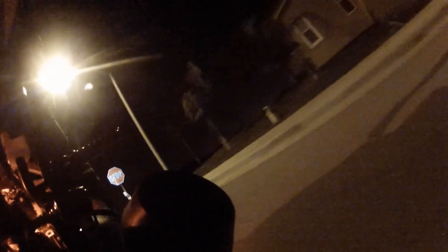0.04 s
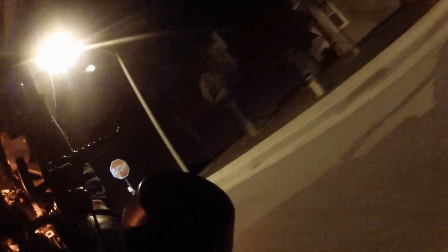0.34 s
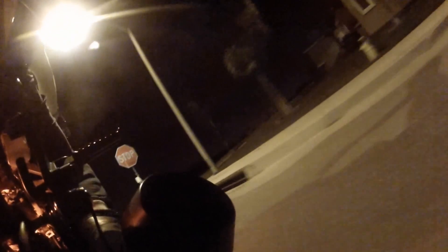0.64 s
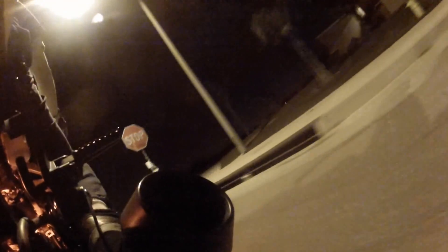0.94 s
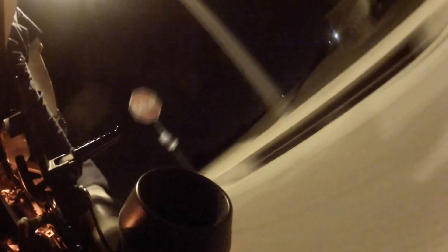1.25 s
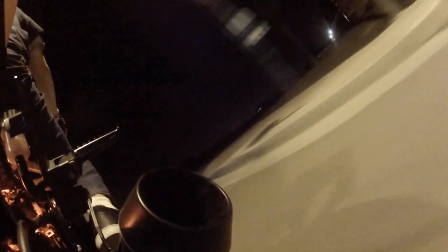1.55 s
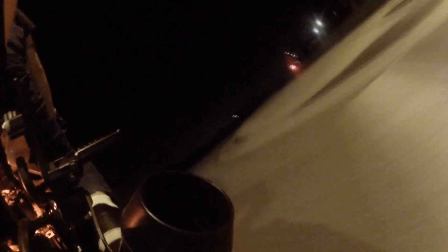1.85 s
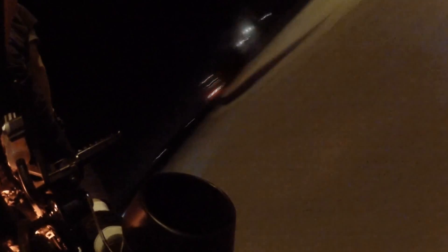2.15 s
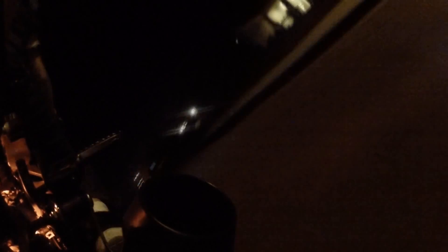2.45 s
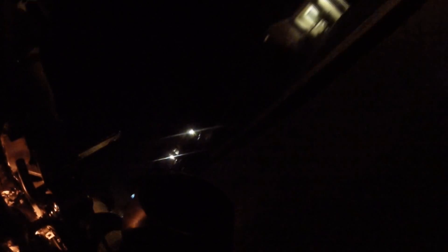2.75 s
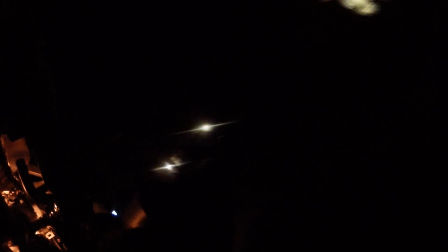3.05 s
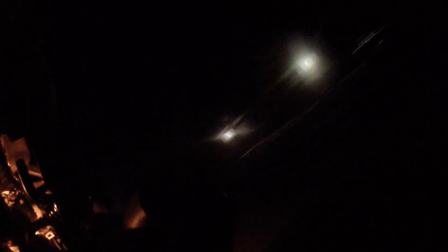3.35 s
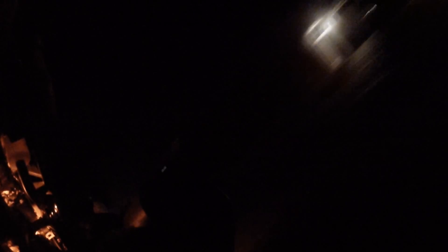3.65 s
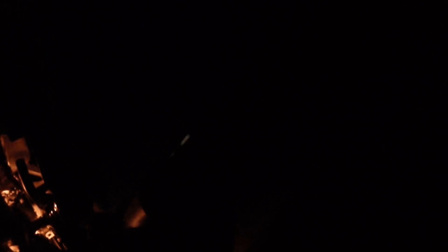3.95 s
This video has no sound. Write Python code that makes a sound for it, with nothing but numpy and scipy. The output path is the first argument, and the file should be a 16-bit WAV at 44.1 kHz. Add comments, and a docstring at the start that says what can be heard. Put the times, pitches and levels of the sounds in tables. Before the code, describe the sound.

A motorcycle engine runs close to the microphone, stumbling at low revs for the first half second. It sinks to a deep, uneven chug, growing slightly louder with a faint click at about 1.3 seconds. From 2 seconds it accelerates hard, rising steadily in pitch and brightening until the end at 4 seconds. A light metallic engine rattle and low wind and road rush continue underneath, and peaks distort slightly.

```python
"""A motorcycle, close up from a microphone on its own frame: it stumbles at low revs, lugs, then pulls
hard up through the revs. Firing pulses ring the exhaust and the valve gear rattles once a cycle.
Wind and road rush underneath. The overloaded recorder flattens the peaks, clicks once as its level
steps up, and mirrors the sound faintly around a high whistle frequency."""
import sys
import numpy as np
from scipy import signal
from scipy.fft import rfft, irfft
from scipy.io import wavfile
from scipy.ndimage import uniform_filter1d

SR = 44100
rng = np.random.default_rng(int(sys.argv[2]) if len(sys.argv) > 2 else 0)


def inscribe(sig):
    """Save sig as 16-bit PCM at rate SR to the path in sys.argv[1].

    A 1-D sig is mono; a 2-D sig holds one channel per row.
    Samples are clipped to [-1, 1] before scaling.
    """
    pcm = np.round(np.clip(np.atleast_2d(sig).T, -1, 1) * 32767)
    wavfile.write(sys.argv[1], SR, pcm.astype(np.int16))


N = 176400
T = np.arange(N) / SR

# engine speed: time_s, firing_rate_hz
FIRING_RATE = [(0, 68.8), (.3, 67.4), (.48, 67.4), (.61, 60), (.89, 54.5), (1.12, 48.2), (1.46, 45.6),
               (1.79, 46.2), (2.05, 49.8), (2.28, 62.9), (2.5, 73.2), (2.74, 82), (2.99, 104.3),
               (3.14, 116.9), (3.37, 134.7), (3.74, 162.8), (4, 176.7)]
# exhaust at the microphone, misfires aside: time_s, level_db
EXHAUST_LEVEL = [(0, -14.5), (.3, -14.2), (.45, -15), (.65, -16), (1.32, -17.2), (1.35, -14), (1.75, -13.8),
                 (1.91, -12.8), (1.97, -14), (2.05, -12), (2.17, -10.7), (2.4, -11.9), (2.85, -12),
                 (3.12, -10.3), (3.35, -13), (3.85, -13.3), (3.95, -11.3)]
# spells of weak firing: start_s, length_s, gain_db
MISFIRE_SPELLS = [(-.02, .066, -7), (.104, .058, -7.5), (.222, .058, -11), (.34, .06, -7.5),
                  (.49, .078, -6.5)]
# uneven firing: time_s, scatter_db, strong_weak_ratio, second_pulse_ratio
UNEVENNESS = [(0, 1.2, .03, .05), (.55, 1.8, .05, .1), (.9, 2.0, .08, .25), (1.28, 1.2, .04, .1),
              (1.38, 1.5, .04, .72), (1.85, 1.5, .04, .62), (2.1, 1.1, .04, .28), (2.5, .7, .03, .1),
              (3.15, .5, .06, .02), (3.45, 1.0, .24, .02), (3.7, 1.0, .13, .02), (4, .6, .05, .02)]
# exhaust pipe trailing at low revs, pulling, and wide open: frequency_hz, gain_db
PIPE_TRAILING = [(22, -17), (42, -3), (58, 8), (72, -1), (92, -2), (125, -7), (183, 4), (205, -1),
                 (240, -3), (285, -3), (328, 3), (390, -7), (470, -22), (540, -30), (650, -24), (780, -38),
                 (1200, -47), (3000, -68)]
PIPE_PULLING = [(22, -30), (44, -8), (61, 7), (85, -1), (110, -5), (160, -1), (210, 2), (260, -3), (330, 2),
                (410, 0), (470, -6), (535, -27), (630, -12), (760, -27), (1000, -29), (1500, -42),
                (3000, -66)]
PIPE_WIDE_OPEN = [(22, -42), (45, -18), (70, -3), (125, -8), (175, -4), (270, -8), (350, 2), (440, 4),
                  (505, -2), (560, -18), (660, -5), (710, -7), (800, -29), (1000, -32), (1500, -36),
                  (3000, -56)]
# tone of the valve gear and gas rasp: frequency_hz, gain_db
VALVE_SPECTRUM = [(300, -15), (650, 2), (1000, 0), (1350, -9), (1750, -8), (1950, -11), (2100, -7),
                  (2230, -4), (2400, -10), (2700, -15), (3050, -10), (3400, -21), (5000, -23), (6000, -27)]
# valve gear at the microphone: time_s, level_db
VALVE_LEVEL = [(0, -47), (.45, -48.5), (.65, -46), (1.05, -43.5), (1.6, -46), (2.1, -45), (2.6, -43.5),
               (2.9, -44), (3.13, -38), (3.22, -42.5), (3.55, -44), (3.9, -38)]
# tone of the wind and road: frequency_hz, gain_db
WIND_ROAD_SPECTRUM = [(20, -24), (60, -11), (120, -8), (200, -2), (350, 3), (460, -1), (550, -17),
                      (660, -10), (800, -25), (2000, -47)]
# wind and road at the microphone: time_s, level_db
WIND_ROAD_LEVEL = [(0, -32), (.5, -31), (1, -27), (1.9, -26), (2.5, -33), (3.1, -37), (3.5, -27), (4, -32)]

THROTTLE_OPENS_S, LEVEL_STEP_S = 2.0, 1.333
PULLING_FADE_HZ, WIDE_OPEN_FADE_HZ = (56, 72), (117, 134)  # firing rates over which each tone comes in
WAVER_EDGES_HZ = (130, 260, 400, 580)
CEILING_DB = (-8.9, -5.9)  # before and after the recorder's level step


def exhaust(cycles):
    """Firing pulses ring the pipe, which brightens with the revs; misfires dip the level."""
    pulses = firing_pulses(cycles)
    rate_hz = curve(FIRING_RATE)
    pulling = np.interp(rate_hz, PULLING_FADE_HZ, (0, 1)) * (T > THROTTLE_OPENS_S)
    wide_open = np.interp(rate_hz, WIDE_OPEN_FADE_HZ, (0, 1))
    pipe = ring_pipe(pulses * (1 - pulling), PIPE_TRAILING)
    pipe += ring_pipe(pulses * (pulling - wide_open), PIPE_PULLING)
    pipe += ring_pipe(pulses * wide_open, PIPE_WIDE_OPEN)
    misfire_db = sum(db * ((T >= start) & (T < start + length)) for start, length, db in MISFIRE_SPELLS)
    level_db = curve(EXHAUST_LEVEL) + uniform_filter1d(misfire_db, size=250)
    return steady(waver(pipe)) * amp(level_db)


def firing_pulses(cycles, second_lag_cycles=.54, jitter_s_per_db=.00011):
    """One uneven firing a cycle, and a second pulse that grows while the engine lugs."""
    count = np.arange(1, int(cycles[-1]) + 1)
    first_s = np.interp(count, cycles, T)
    second_s = np.interp(count + second_lag_cycles, cycles, T)
    scatter_db, alternation, second_size = (curve(UNEVENNESS, col, first_s) for col in (1, 2, 3))
    first_slip, first_db, second_slip, second_db = scatter_db * rng.standard_normal((len(count), 4)).T
    strong_weak = 1 + alternation * (-1.) ** count
    first = clicks(first_s + jitter_s_per_db * first_slip, strong_weak * amp(first_db))
    second = clicks(second_s + jitter_s_per_db * second_slip, second_size * amp(second_db))
    return first + second


def ring_pipe(pulses, response, bass_lag_s=.007, bass_hz=200):
    """Each resonance of the pipe rings on after a pulse, and the bass arrives late."""
    cepstrum = irfft(np.log(gains(response)))
    cepstrum[1:N] *= 2  # minimum phase: no ringing ahead of the pulse
    cepstrum[N + 1:] = 0
    hz = np.fft.rfftfreq(2 * N, 1 / SR)
    phase_lag = 2 * np.pi * bass_lag_s * bass_hz * np.tanh(hz / bass_hz)
    return irfft(rfft(pulses, 2 * N) * np.exp(rfft(cepstrum) - 1j * phase_lag))[:N]


def waver(pipe, depth_db=1.6, rate_hz=9):
    """Each band of the exhaust swells and fades by itself."""
    hold, wavering = int(SR / rate_hz), 0
    lows = [signal.sosfiltfilt(signal.butter(4, hz, fs=SR, output="sos"), pipe) for hz in WAVER_EDGES_HZ]
    for band in np.diff([0 * pipe] + lows + [pipe], axis=0):
        steps = np.repeat(rng.standard_normal(N // hold + 1), hold)
        wavering += band * amp(depth_db * uniform_filter1d(steps, hold)[:N])
    return wavering


def valve_gear(cycles, decay_cycles=.25, floor=.7, clatter_gain=.7):
    """Metallic rasp that swells at each firing; part of the clatter repeats from cycle to cycle."""
    phase = cycles % 1
    since_firing_s = phase / curve(FIRING_RATE)
    clatter = colour(rng.standard_normal(N)[(since_firing_s * SR).astype(int)], VALVE_SPECTRUM)
    rasp = noise(VALVE_SPECTRUM) + clatter_gain * clatter / clatter.std()
    swell = floor + np.exp(-phase / decay_cycles)
    return rasp / rasp.std() * swell / swell.mean() * amp(curve(VALVE_LEVEL))


def wind_and_road():
    """Low rush of air and tyres under the engine."""
    return noise(WIND_ROAD_SPECTRUM) * amp(curve(WIND_ROAD_LEVEL))


def recorder_click(peak_db=-14, decay_s=.0002):
    """A faint recorder click as the level steps up 3 dB."""
    return amp(peak_db) * (T >= LEVEL_STEP_S) * np.exp(-np.abs(T - LEVEL_STEP_S) / decay_s)


def amp(db):
    """Decibels to gain."""
    return 10 ** (np.asarray(db) / 20)


def curve(table, col=1, at=T):
    """One column of a table, joined by straight lines in time."""
    rows = np.array(table)
    return np.interp(at, rows[:, 0], rows[:, col])


def gains(spectrum):
    """Rows of frequency_hz, gain_db as a gain for each FFT bin."""
    hz, db = np.array(spectrum).T
    bin_hz = np.fft.rfftfreq(2 * N, 1 / SR)
    return amp(np.interp(np.log(bin_hz + 1e-3), np.log(hz), db))


def colour(x, spectrum):
    """Filter without delay."""
    return irfft(rfft(x, 2 * N) * gains(spectrum))[:N]


def noise(spectrum):
    """Coloured noise of rms 1."""
    x = colour(rng.standard_normal(N), spectrum)
    return x / x.std()


def steady(x, size=3000):
    """Bring the running rms to 1."""
    power = uniform_filter1d(uniform_filter1d(x * x, size), size)
    return x / np.sqrt(power + 1e-14)


def clicks(times_s, sizes):
    """Impulses, each shared between two neighbouring samples."""
    at = np.clip(times_s * SR, 0, N - 2)
    i = at.astype(int)
    return np.bincount(i, sizes * (1 - at + i), N) + np.bincount(i + 1, sizes * (at - i), N)


def scene(start_cycle=.76, side_db=-55):
    """Everything is centred, with a very faint low noise differing between left and right."""
    cycles = start_cycle + np.cumsum(curve(FIRING_RATE)) / SR
    centre = exhaust(cycles) + valve_gear(cycles) + wind_and_road() + recorder_click()
    side = amp(side_db) * noise(WIND_ROAD_SPECTRUM)
    return np.array([centre + side, centre - side])


def record(dry, band_hz=5900, mirror_hz=12000, mirror_gain=amp(-.5), hiss_db=-72, top_hz=15400):
    """Peaks clip; a narrow-band, stepped converter mirrors the sound into the top octave, over hiss."""
    ceiling = amp(np.where(T < LEVEL_STEP_S, *CEILING_DB))
    clipped = np.clip(dry, -ceiling, ceiling)
    narrow = signal.sosfilt(signal.butter(8, band_hz, fs=SR, output="sos"), clipped)
    slope = np.gradient(narrow, axis=1) * SR
    mirror = mirror_gain * slope * np.sin(2 * np.pi * mirror_hz * T) / (np.pi * mirror_hz)
    hiss = amp(hiss_db) * rng.standard_normal((2, N))
    top_cut = signal.ellip(8, .2, 70, top_hz, fs=SR, output="sos")
    return signal.sosfilt(top_cut, narrow + mirror + hiss)


dry = scene()
out = record(dry)
inscribe(out)
```